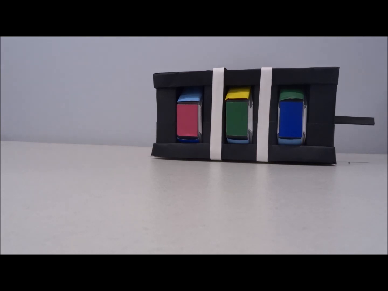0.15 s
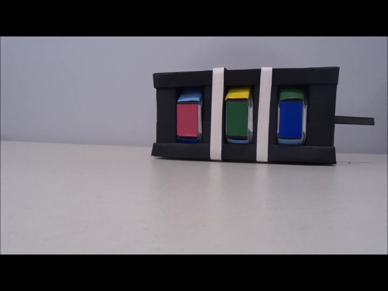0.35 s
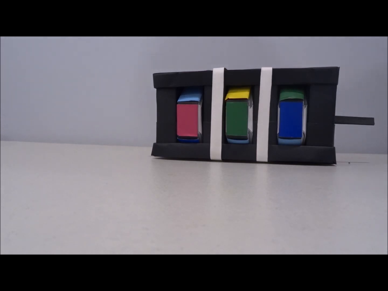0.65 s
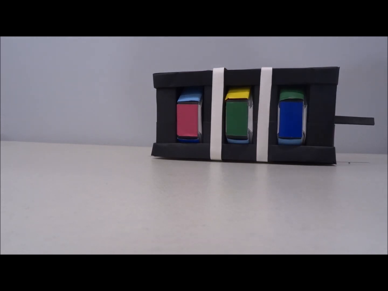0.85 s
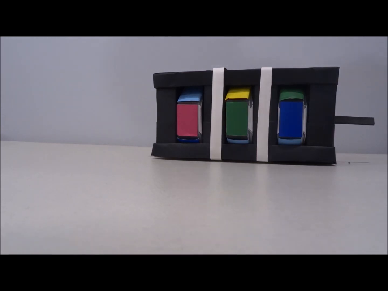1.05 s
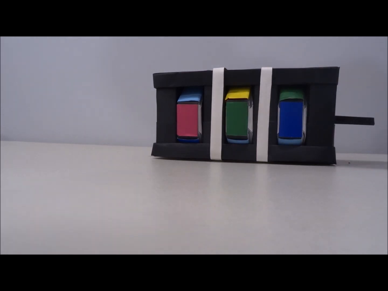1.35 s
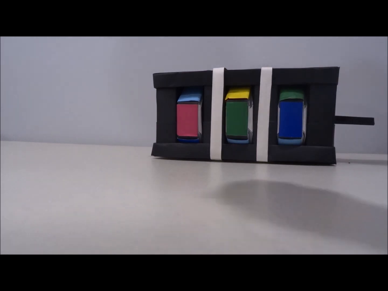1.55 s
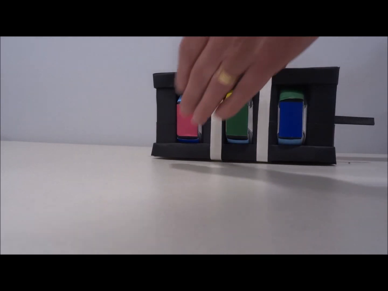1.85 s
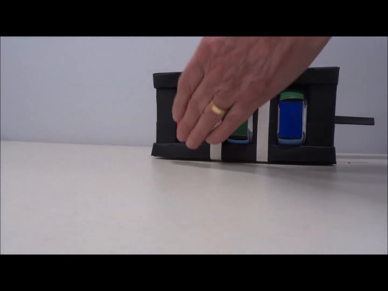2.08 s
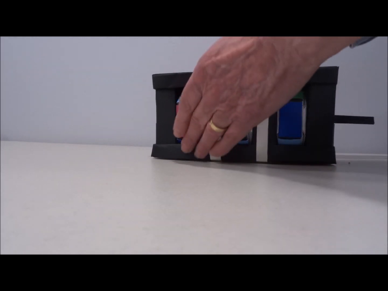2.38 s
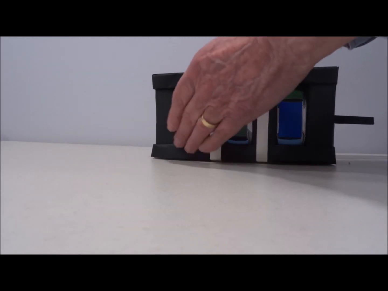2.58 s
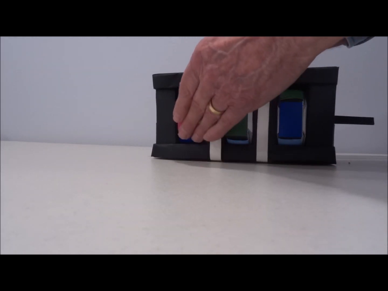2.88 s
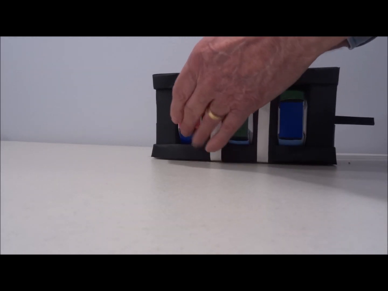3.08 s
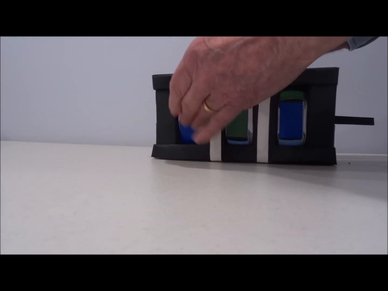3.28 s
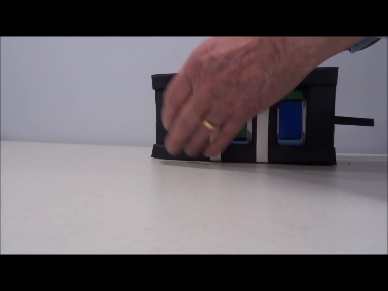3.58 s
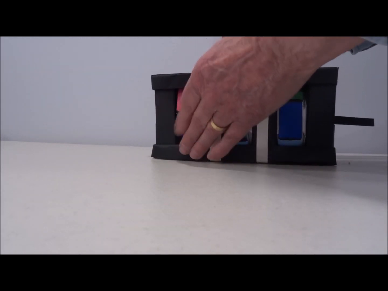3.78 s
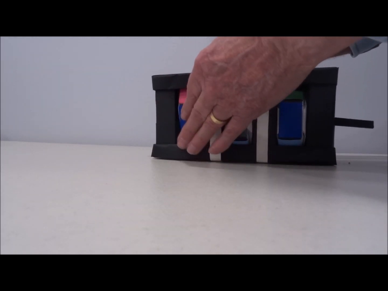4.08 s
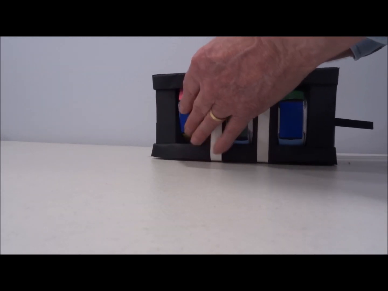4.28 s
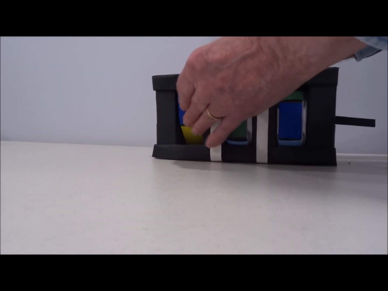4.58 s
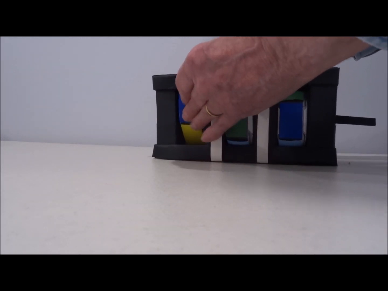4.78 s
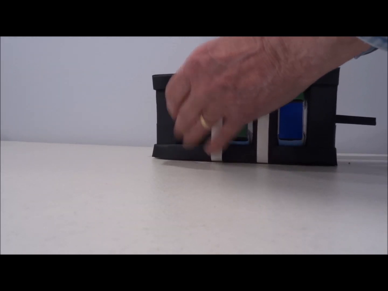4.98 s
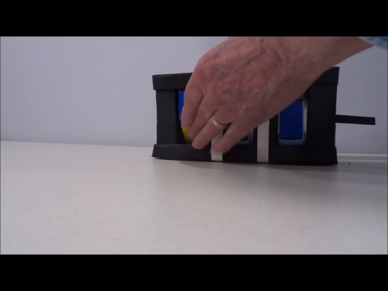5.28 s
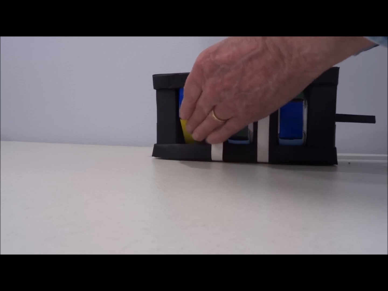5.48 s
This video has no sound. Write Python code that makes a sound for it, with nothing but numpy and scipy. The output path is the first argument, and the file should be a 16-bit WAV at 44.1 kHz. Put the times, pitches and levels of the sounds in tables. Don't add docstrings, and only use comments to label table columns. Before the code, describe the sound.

Close, dry stereo sound of stiff card being worked by hand on a table. It begins nearly still, with low hum and muffled thuds, then fabric rustle and soft contact. Short papery scrapes and crisp ticks grow busier, broken by hollow cardboard knocks and one hard double snap. Rims then slide with faint squeaks, clicking again at the end, in a small room.

```python
import sys
import numpy as np
from scipy import signal
from scipy.fft import rfft, irfft, next_fast_len
from scipy.io import wavfile

SR = 44100
rng = np.random.default_rng(int(sys.argv[2]) if len(sys.argv) > 2 else 0)


def unload_wav(signal):
    wavfile.write(
        sys.argv[1],
        SR,
        np.round(np.clip(np.atleast_2d(signal).T, -1, 1) * 32767).astype(np.int16),
    )


def makeup_ratio(level_db):
    decades = np.asarray(level_db, float) / 20
    return 10 ** decades


N = 248724
TIME = np.arange(N) / SR

# (time [s], peak [dB], hold [s], pitch of the body [Hz], panel slap [dB])
THUDS = [(0.0, -41, 0.0029, 585, 2.5), (0.171, -42, 0.014, 850, 1.5), (0.194, -41.5, 0.022, 735, 3),
         (0.2456, -34.5, 0.054, 725, 2.5), (0.4107, -33, 0.067, 640, 1.5), (1.781, -33, 0.0077, 206, -6),
         (1.949, -40, 0.09, 570, 0), (2.031, -35.5, 0.027, 225, -6), (2.212, -42.5, 0.12, 330, -6),
         (2.398, -31.5, 0.039, 427, 2.5), (4.067, -25, 0.032, 223, -2), (5.063, -30.5, 0.026, 165, -9)]
# (frequency [Hz], level per Hz [dB])
THUD_COLOUR = [(59, -29), (192, 0), (584, -2.5), (1200, -8), (1780, -13.5), (2300, -14.5), (4000, -27),
               (7000, -34)]
THUD_FADE_S, THUD_FADE_PER_HOLD = 0.068, 0.52
DULL_OVER_BODY, DULL_POWER, DULL_PER_DB = 6.2, 2.54, 1.33
FRONT_DB, FRONT_CYCLES = -3, 4.5
SLAP_HZ, SLAP_WIDTH_HZ = 1200, 650

# (frequency [Hz], level per Hz [dB])
SLEEVE = [(1000, -19), (1500, -7), (2200, -1.5), (3300, -3.5), (5000, -3.5), (7000, -6), (9500, -4),
          (11300, -5.5)]
HANDLING = [(290, -13.5), (500, 11), (712, -4.5), (1000, 2), (2060, -8), (4580, -13.5), (7800, -46),
            (13200, -120)]
HUM = [(12, -46), (20, -23), (81, -2.5), (230, -1), (420, -12.5), (709, -23), (1170, -58), (1980, -120)]
# (frequency [Hz], likeness [-1 to 1])
LIKENESS = [(60, 0.98), (170, 0.99), (490, 0.91), (1410, 0.64), (4040, 0.66), (11600, 0.7)]
# (time [s], effort [dB])
EFFORT = [(0, 7.5), (.53, 4.5), (1.1, 5), (1.75, 8.5), (1.81, 17), (1.98, 18), (2.37, 6.5), (2.62, 7.5),
          (3.19, 15), (3.39, 20), (3.62, 9), (3.9, 9.5), (4.15, 12.5), (4.4, 25), (4.48, 15.5), (5.11, 10),
          (5.5, 13), (5.64, 21)]
HAND_DB, SLEEVE_DB, HUM_DB = -67.5, -73, -60.5
SLEEVE_FOLLOWS, HUM_FOLLOWS = 0.64, 0.33
# (time of peak [s], level [dB], build [s], fade [s])
SHIFTS = [
    (0.0, -50, .1, 0.25),
    (.79, -49.5, 0.5, 0.61),
    (1.84, -48, 0.32, 0.17),
    (2.37, -52, 0.077, 0.98),
    (3.39, -40, 0.13, 0.3),
    (4.1, -45, 0.3, 0.32),
    (5.15, -55.5, 1, 1),
]
# (time of peak [s], level [dB], build [s], fade [s])
REACHES = [
    (1.25, -60.5, 0.56, 0.35),
    (1.93, -55, 0.93, 0.33),
    (2.6, -58.5, 0.43, 0.83),
    (4.24, -55.5, 0.11, 1),
    (5.45, -42.5, 0.13, 0.39),
]

# (time [s], peak [dB], pitch [Hz], cycles to die [count])
TAPS = [(0.1735, -35.5, 990, 11), (0.195, -29, 890, 7.4), (0.2472, -28, 950, 8), (0.4115, -32, 810, 8),
        (2.036, -40, 310, 14), (2.049, -37, 320, 11), (2.078, -34, 597, 14), (2.4, -31, 750, 5.6),
        (2.4003, -33, 1650, 14), (2.406, -27, 335, 12), (2.416, -25, 520, 13), (2.436, -28, 1100, 11),
        (2.44, -41, 567, 8.2), (2.471, -32, 520, 12), (2.7878, -45, 1540, 6), (2.788, -37, 4000, 6),
        (2.811, -38, 1730, 8), (2.924, -43, 3300, 10), (2.933, -41, 3200, 10), (3.0076, -37, 1090, 9),
        (3.0648, -31, 1030, 8), (3.188, -37, 1170, 10), (3.229, -26, 2490, 14), (3.4318, -34, 3580, 8),
        (3.448, -39, 3000, 10), (3.495, -36, 560, 13), (3.512, -38, 2000, 10), (4.0763, -9.5, 990, 7.3),
        (4.0776, -23, 2900, 8), (4.087, -21, 450, 5), (4.2266, -37, 4200, 10), (4.2542, -41, 4100, 10),
        (4.323, -25, 900, 10), (4.338, -16, 8200, 14), (4.3399, -15, 4300, 9), (4.3402, -10, 3240, 10),
        (4.352, -32, 610, 6.5), (4.359, -30, 630, 10), (4.387, -23, 2600, 12), (4.4, -22, 3000, 11),
        (4.421, -32, 2300, 14), (4.501, -37, 2810, 16), (4.7023, -38, 1140, 10), (5.052, -33, 800, 7.2),
        (5.057, -28, 420, 4.5), (5.111, -29.5, 600, 6), (5.117, -34, 900, 6), (5.352, -31, 950, 7.1),
        (5.4823, -20.5, 6200, 11), (5.6154, -25.5, 1390, 10)]
# (time [s], peak [dB], pitch [Hz])
BUMPS = [(1.783, -46, 45), (1.788, -40.5, 146), (2.05, -56, 50), (3.078, -45.5, 92), (3.33, -48, 70),
         (3.839, -48, 54), (3.973, -42.5, 163), (4.081, -33, 240), (3.319, -33.5, 301), (4.099, -40, 58.4),
         (4.349, -34.5, 79.6), (4.551, -47, 40.8), (2.45, -59, 40), (3.621, -64, 44.4), (4.752, -47.5, 79),
         (5.039, -30, 185), (5.056, -29, 169), (5.059, -44, 51), (5.501, -48, 83)]

# (start [s], level [dB], body relative to it [dB], hold [s])
STROKES = [(1.791, -40.5, 2, 0.018), (1.854, -39.5, 3, 0.013), (1.862, -43.5, -19, 0.043),
           (2.496, -64, -7, 0.034), (2.613, -41.5, -9, 0.012), (3.0584, -36, 1.5, 0.038),
           (3.268, -34, -19, 0.031), (3.47, -41.5, -5, 0.055), (3.506, -54, -4, 0.011),
           (3.739, -46, 6.5, 0.017), (4.143, -38.5, 11, 0.015), (4.218, -43.5, -6, 0.065),
           (4.328, -23, -2, 0.041), (4.923, -37.5, -5, 0.023), (4.949, -43.5, 7.5, 0.018),
           (5.121, -52.5, 14, 0.016), (5.244, -55, 13, 0.079), (5.346, -38.5, 4.5, 0.052)]
# (release [s], level [dB], body relative to it [dB], build [s], fade [s])
DRAGS = [
    (2.0, -43.5, 7, 0.32, 0.48),
    (2.832, -40, 2.5, 0.053, 0.12),
    (3.018, -36.5, 2, 0.097, 0.11),
    (3.221, -31.5, -5, 0.042, 0.024),
    (3.301, -26, -1, 0.032, 0.046),
    (4.063, -33, 5.5, 0.05, 0.08),
    (4.321, -28, -0.5, 0.031, 0.025),
]
# (start [s], level [dB], hold [s])
SHUFFLES = [
    (2.312, -55, 0.072),
    (2.677, -45.5, 0.013),
    (2.927, -69, 0.049),
    (3.152, -43.5, 0.057),
    (3.904, -51.5, 0.021),
    (3.953, -45.5, 0.028),
]
# (start [s], level [dB], body relative to it [dB], hold [s])
SLIDES = [
    (4.492, -35.5, -5, 0.042),
    (4.594, -37, 0.5, 0.036),
    (4.691, -37, -0.5, 0.033),
    (4.723, -38, 2, 0.039),
    (4.821, -40.5, -3, 0.06),
    (5.413, -36, -1, 0.073),
    (5.485, -38, -1.5, 0.086),
    (5.584, -40.5, 2, 0.058),
]
# (frequency [Hz], width [Hz], level [dB])
CARD = [(548, 240, 6), (1120, 134, 4.5), (1660, 590, -5), (2330, 390, 2.5), (2900, 1400, -1),
        (4300, 3100, -4.5), (5840, 3600, -13.5), (7970, 1550, 1.5), (11140, 2140, 13)]
# (frequency [Hz], width [Hz], level [dB])
SLOT = [(2230, 270, 3), (2920, 400, 1), (4740, 380, -13)]
STROKE_HISS_DB, DRAG_HISS_DB, SLIDE_HISS_DB = -6, -14.5, -9.5
SHUFFLE_BODY_DB, SHUFFLE_HISS_DB = 7.5, -31
SLOT_DB, SLIDE_HOLLOW_DB = -2.5, -3
HISS_PER_DB, FIRM_DB = 0.48, -28
FADE_S, FADE_PER_HOLD = 0.025, 0.79

# (start [s], level [dB], hold [s], pitch [Hz])
SINGING = [(1.854, -50.5, 0.048, 2070), (1.922, -48.5, 0.056, 1590), (1.931, -52.5, 0.04, 307),
           (1.981, -40, 0.06, 315.4), (2.031, -34.5, 0.012, 316.4), (1.951, -48, 0.12, 604),
           (1.98, -48.5, 0.057, 1120), (2.208, -54.5, 0.093, 319), (2.212, -58, 0.075, 545),
           (2.404, -38, 0.014, 337.5), (2.41, -40.5, 0.038, 576), (3.318, -32.5, 0.026, 550),
           (3.352, -44.5, 0.021, 733), (3.384, -46, 0.011, 545), (3.41, -52.5, 0.04, 545),
           (4.335, -39.5, 0.03, 3930), (4.344, -34, 0.014, 608), (4.405, -48, 0.012, 547),
           (4.448, -52.5, 0.081, 560), (5.045, -52.5, .02, 800), (4.598, -51, 0.024, 1110),
           (4.335, -53, 0.025, 10200), (5.585, -53, 0.028, 2400), (2.637, -53.5, 0.026, 610),
           (4.11, -51, 0.017, 2460), (4.832, -60, 0.048, 1085), (4.838, -48, 0.017, 564),
           (5.592, -45, .05, 612)]
SING_WIDTH, SING_RISE_S, SING_FADE_S = 0.13, 0.018, 0.074
# (start [s], level [dB], hold [s], pitch [Hz])
SQUEAKS = [(3.904, -62, 0.01, 3240), (4.503, -49.5, 0.034, 2900), (4.51, -66, 0.024, 4700),
           (4.505, -51.5, .04, 1120), (4.52, -46, .03, 597), (4.62, -52, .025, 2950),
           (4.6, -67, 0.03, 5000), (4.733, -46.5, 0.011, 2870), (4.735, -51, .03, 1100),
           (4.77, -49, 0.0096, 495), (4.835, -52.5, 0.057, 1116), (4.85, -58, .04, 2640),
           (5.368, -54, 0.014, 2900), (5.375, -47, 0.011, 745), (5.39, -57, .02, 2200),
           (5.435, -48, .035, 2930), (5.462, -49, .008, 4600), (5.464, -43.5, .008, 1190),
           (5.5, -58, 0.045, 2900), (5.56, -51.5, 0.061, 1013)]
SQUEAK_WIDTH, SQUEAK_RISE_S, SQUEAK_FADE_S = 0.051, 0.005, 0.021
EVENNESS = 0.47

# (time [s], peak [dB], pitch [Hz], length [s])
CRACKLES = [(2.304, -46, 3500, 0.1), (2.311, -45, 5000, 0.047), (2.491, -44.5, 5050, 0.16),
            (2.679, -46, 2440, 0.052), (2.685, -48, 2410, 0.046), (2.799, -42.5, 3060, 0.73),
            (4.142, -38, 2550, 0.058), (4.7396, -39, 2580, 0.058), (5.131, -44.5, 5030, 0.28),
            (5.261, -42, 5400, 0.059), (5.109, -39, 4730, 0.11), (2.923, -50, 2620, 0.035),
            (2.336, -46, 3000, 0.016), (2.368, -48, 3200, .03), (2.439, -50, 5500, 0.14),
            (3.541, -42, 3160, 0.016), (3.8023, -45, 3280, 0.13), (4.194, -45, 7000, 0.017),
            (5.209, -50, 4850, 0.037), (5.306, -41.5, 5000, 0.025)]
# (time [s], peak [dB], pitch [Hz], box thump
# relative to it [dB])
THUMP_TICKS = [(2.37, -50, 1100, 8), (5.0402, -24.5, 670, -32), (5.0449, -26.5, 800, -32),
               (5.0368, -27.5, 770, -30), (3.4316, -38, 1300, -8), (4.254, -29, 850, -6),
               (4.5392, -34, 2250, -4), (4.5986, -33, 2200, -16), (4.8, -33, 3000, -19),
               (4.8008, -35, 1650, -19), (4.8026, -39, 1650, -19), (4.9599, -27, 3160, -12),
               (4.9606, -36, 1650, -10), (3.494, -27, 1740, -13.5), (5.6157, -31, 1200, -20.5)]
# (time [s], peak [dB], pitch [Hz], broad snap relative to it [dB])
TICKS = [(3.3167, -22, 3300, -20), (3.0674, -32, 3380, -13.5), (3.2793, -27, 2890, -18),
         (3.2959, -25, 2440, -18), (4.2245, -41, 5000, -10), (4.2262, -32, 3000, -12),
         (3.425, -35, 2900, -17), (3.4937, -23, 4350, -16), (3.639, -50, 8000, -14),
         (3.6503, -29, 3900, -12), (3.8059, -30, 3200, -15), (3.8977, -36, 3000, -18),
         (3.9055, -43, 3000, -14), (3.9105, -42, 3200, -14), (4.0774, -19, 2170, -17),
         (4.0797, -20, 1900, -20), (4.0864, -44, 2510, -9), (4.1632, -38, 2600, -18),
         (4.2858, -32, 2800, -20), (4.3225, -27, 2770, -20), (5.042, -31, 3350, -11),
         (5.0365, -36, 3000, -11), (4.3379, -9, 4200, -12), (4.3389, -11, 2350, -16), (4.7, -41, 2910, -18),
         (4.7108, -34, 3300, -16), (5.1, -44.5, 4600, -2), (5.2989, -44, 3600, -4),
         (5.2637, -37, 5400, -10), (5.3527, -33, 4800, -14), (5.4823, -18, 2950, -14)]
SLIP_S, TICK_THUMP_DB, FLAP_SNAP_DB = 0.024, -19.5, -17
CREASE_SNAP_DB, CREASE_THUMP_DB = -4.5, -27
TICK_CYCLES, TICK_TRAIL_DB, TICK_EDGE_DB = 10.5, -23, -10

# (time [s], level at 560 Hz [dB], then relative to it: hollow boom [dB], wall slap [dB], edge crack [dB])
KNOCKS = [
    (3.3155, -22, -10, -29, 4),
    (3.3172, -14.5, -9.5, 1, -4),
    (4.0694, -31.5, -4.5, 9, 9),
    (4.0791, -29.5, 2, 15.5, -29),
    (4.0776, -27.5, 3.5, -5, 11),
    (4.3391, -12.5, -16.5, -7, -14),
    (5.0359, -46, 7, 7, -2),
    (5.0406, -41.5, 3, 9.5, -2),
    (5.045, -41.5, 10, 11, -4),
    (5.614, -39, -14, -7, 6),
]
# (frequency [Hz], level [dB], time to fall 60 dB [s])
BOX = [(165, -6, 0.19), (242, 0.5, 0.14), (302, -8, 0.13), (412.4, 1, 0.3), (447, 0.5, 0.12),
       (545, -5.5, 0.23), (570, -1, 0.11), (728, 3.5, 0.018), (752, -6, 0.16), (855, -13.5, 0.11),
       (1112, 1.5, 0.025), (1300, -20, 0.18), (1740, -5.5, 0.075), (2330, -4, 0.014)]
ROOM_T60_S, ROOM_DB, WALL_CUT_HZ = 0.11, -15.5, 21000


def rms_one(x):
    return x / np.sqrt(np.mean(x ** 2) + 1e-20)


def at_hz(points, hz):
    table = np.array(points)
    return np.interp(np.log(hz), np.log(table[:, 0]), table[:, 1])


def passed(x, hz, kind):
    return signal.sosfilt(signal.butter(2, np.clip(hz, 10, .45 * SR), kind, fs=SR, output="sos"), x)


def resonance(x, hz, width):
    r = np.exp(-np.pi * width / SR)
    return (1 - r * r) / 2 * signal.lfilter([1, 0, -1], [1, -2 * r * np.cos(2 * np.pi * hz / SR), r * r], x)


def ring(clicks, hz, t60):
    r, w = makeup_ratio(-60 / (t60 * SR)), 2 * np.pi * hz / SR
    return signal.lfilter([0, np.sin(w)], [1, -2 * r * np.cos(w), r * r], clicks + 1e-18)


def lingering(clicks, t60):
    return signal.lfilter([1], [1, -makeup_ratio(-60 / (t60 * SR))], clicks + 1e-18)


def swell(t, hold, fade, rise):
    return np.clip(t / rise, 0, 1) * np.exp(-np.log(10) * np.clip((t - hold) / max(fade, .001), 0, 8))


def build_up(t, db, build, hold, fade):
    return makeup_ratio(db + 20 * np.clip(t / build, -8, 0)) * swell(t + 9, 9 + hold, fade, rise=1)


def drift(rate):
    r = np.exp(-80 * np.pi * rate / SR)
    slow = signal.lfilter([1], [1, -2 * r, r * r], rng.standard_normal(N // 40 + 2002))[2000:]
    return np.interp(np.arange(N) / 40, np.arange(len(slow)), rms_one(slow))


def coloured(spectrum, patchy_db):
    out, edges = 0, 16 * 2 ** np.arange(0, 10, .5)
    white = rng.standard_normal((2, 2, N))
    for k, (low, high) in enumerate(zip(edges, edges[1:])):
        centre = np.sqrt(low * high)
        level_db = at_hz(spectrum, centre)
        if level_db < -42:
            continue
        mid, side = passed(white[k % 2], [low, high], "band")
        alike = np.clip(at_hz(LIKENESS, centre), -1, 1)
        gain = makeup_ratio(level_db + patchy_db * drift(9.1))
        out = out + gain * (np.sqrt(1 + alike) * mid + np.sqrt(1 - alike) * side * [[1], [-1]])
    return rms_one(out)


def thuds():
    noise, out = coloured(THUD_COLOUR, patchy_db=-1.0), np.zeros((2, N))
    for s, peak_db, hold, body_hz, slap_db in THUDS:
        fade = THUD_FADE_S + THUD_FADE_PER_HOLD * hold
        dull_hz = DULL_OVER_BODY * 500 * (body_hz / 500) ** DULL_POWER
        dull_hz = dull_hz * makeup_ratio(DULL_PER_DB * (peak_db + 34.5))
        span = slice(round(s * SR), round((s + .6) * SR))
        t = TIME[span] - s
        front = makeup_ratio(8.0 + FRONT_DB) * ring(1.0 * (t == t[0]), 1.12 * body_hz, FRONT_CYCLES / body_hz)
        burst = noise[:, span] * swell(t, hold, fade, rise=0.0014) + front
        body = 2.0 * resonance(burst, body_hz, 0.52 * body_hz)
        burst = burst + body
        whole = burst - body
        burst = burst - makeup_ratio(slap_db) * resonance(whole, SLAP_HZ, SLAP_WIDTH_HZ) * 2.62
        out[:, span] += makeup_ratio(peak_db - 12.0) * passed(passed(burst, dull_hz, "low"), dull_hz, "low")
    return out


def surge(rows):
    t = TIME[::64]
    power = sum(build_up(t - s, db, build, -0.151, fade) ** 2 for s, db, build, fade in rows)
    return np.interp(TIME, t, power)


def hum(effort_db):
    level = np.sqrt(makeup_ratio(HUM_DB + HUM_FOLLOWS * effort_db) ** 2 + surge(SHIFTS))
    return level * coloured(HUM, patchy_db=1.0)


def sleeve_rustle(effort_db):
    level = np.sqrt(makeup_ratio(SLEEVE_DB + SLEEVE_FOLLOWS * effort_db) ** 2 + surge(REACHES))
    return level * coloured(SLEEVE, patchy_db=-0.85)


def handling(effort_db):
    return makeup_ratio(HAND_DB + effort_db) * coloured(HANDLING, patchy_db=2.5)


def taps():
    out, t = np.zeros(N + 4096), TIME[:4096]
    for s, peak_db, hz, cycles in TAPS:
        i = round(s * SR)
        fading = makeup_ratio(peak_db - 60 * t * hz / max(cycles, 1))
        out[i:i + len(t)] += fading * np.sin(2 * np.pi * hz * t) * np.clip(2 * t * hz, 0, 1)
    return out[:N]


def bumps():
    out, t = np.zeros(N + SR // 2), TIME[:SR // 2]
    for s, peak_db, hz in BUMPS:
        i = round(s * SR)
        fading = makeup_ratio(peak_db - 60 * t / (0.044 + 14.6 / hz))
        out[i:i + len(t)] += fading * np.sin(2 * np.pi * hz * t) * np.clip(t / 0.0023, 0, 1)
    return out[:N]


def rubbed_card():
    sizes = makeup_ratio(3.5 * np.minimum(rng.exponential(1, N), 5)) * rng.choice([-1, 1], N)
    catches = rng.random(N) < 4000 * makeup_ratio(3.0 * drift(40)) / SR
    grains = rms_one(sizes * catches) + 0.52 * rng.standard_normal(N)
    shaped = makeup_ratio(-7) * grains[::-1]
    for k, (hz, width, level_db) in enumerate(CARD):
        shaped = shaped + makeup_ratio(level_db) * resonance(grains, hz, width) * (-1) ** k
    bands = [[380, 1400], [1400, 3600], [3600, 6600], [6600, 11500]]
    layers = [rms_one(passed(shaped, edges, "band")) for edges in bands]
    slot = 0
    for hz, width, level_db in SLOT:
        slot = slot + makeup_ratio(level_db) * resonance(resonance(grains[::-1], hz, width), hz, 2 * width)
    return layers + [rms_one(slot)]


def rubbing():
    t = TIME[::16]
    shapes = [swell(t - s, hold, FADE_S + FADE_PER_HOLD * hold, rise=0.01)
              for s, *_, hold in SLIDES + STROKES + SHUFFLES]
    shapes += [build_up(t - s, 0, build, 0.013, fade) for s, *_, build, fade in DRAGS]
    rows = [(db, body, SLIDE_HISS_DB) for _, db, body, _ in SLIDES]
    rows += [(db, body, STROKE_HISS_DB) for _, db, body, _ in STROKES]
    rows += [(db, SHUFFLE_BODY_DB, SHUFFLE_HISS_DB) for _, db, _ in SHUFFLES]
    rows += [(db, body, DRAG_HISS_DB) for _, db, body, *_ in DRAGS]
    db, body, hiss = np.transpose(rows)
    hiss = hiss + HISS_PER_DB * (db - FIRM_DB)
    levels = makeup_ratio(db - 13 + np.array([body, 0 * db, 0.11 * hiss - 3, hiss, 0 * db + SLOT_DB]))
    levels[4, len(SLIDES):] = 0
    levels[1:3, :len(SLIDES)] *= makeup_ratio(SLIDE_HOLLOW_DB)
    pressure = np.sqrt(levels ** 2 @ np.square(shapes))
    out = np.zeros(N)
    for k, (gain, layer) in enumerate(zip(pressure, rubbed_card())):
        out += np.interp(TIME, t, gain) * layer * (-1) ** k
    return out


def singing(rows, share, rise, fade):
    out = np.zeros(N)
    for s, level_db, hold, hz in rows:
        span = slice(round(s * SR), round((s + .4) * SR))
        t, noise = TIME[span] - s, rng.standard_normal(SR // 2)
        width = share * hz * (hz / 500) ** 0.46
        tone = rms_one(resonance(resonance(noise, hz, width), hz, width))
        tone = rms_one(tone / (np.abs(signal.hilbert(tone)) + 0.36) ** EVENNESS)
        out[span] += makeup_ratio(level_db) * tone[-len(t):] * swell(t, hold, fade, rise)
    return out


def ticks():
    size = 2560
    out, t = np.zeros(N + size), TIME[:size]
    slips = [(*row, TICK_THUMP_DB, SLIP_S, 1) for row in TICKS]
    slips += [(s, db, hz, FLAP_SNAP_DB, thump, SLIP_S, 1) for s, db, hz, thump in THUMP_TICKS]
    slips += [(s, db, hz, CREASE_SNAP_DB, CREASE_THUMP_DB, length, 0) for s, db, hz, length in CRACKLES]
    flick = 1.0 * (t == 0)
    thump = np.sin(2 * np.pi * 600 * t) * makeup_ratio(-60 * t / 0.061) * np.clip(t / 0.0031, 0, 1)
    for s, peak_db, hz, snap_db, thump_db, length, sharp in slips:
        noise = rng.standard_normal((2, size))
        trail_rise = 0.0001 if sharp else 0.033 * length
        trail = noise[0] * swell(t, 0.024 * length, 0.16 * length, trail_rise)
        if sharp:
            tone = ring(flick + makeup_ratio(TICK_TRAIL_DB) * trail, hz, TICK_CYCLES / hz)
        else:
            tone = ring(trail, hz, 6.1 / hz)
        snap_rise = 0.00048 if sharp else 0.015 * length
        snap = passed(noise[1], [1300, 9000], "band") * swell(t, 0.057 * length, 0.26 * length, snap_rise)
        snap = makeup_ratio(snap_db - 2.0) * snap + sharp * makeup_ratio(TICK_EDGE_DB) * passed(flick, hz, "high")
        i = round(s * SR)
        out[i:i + size] += makeup_ratio(peak_db) * (tone / np.abs(tone).max() + snap + makeup_ratio(thump_db - 1.5) * thump)
    return out[:N]


def knocks():
    rows, out = np.array(KNOCKS), np.zeros(N)
    at = np.round(rows[:, 0] * SR).astype(int)
    luck_db = rng.normal(0, 1.5, (len(rows), len(BOX)))
    rattle = rng.standard_normal((3, N))
    for k, (hz, level_db, t60) in enumerate(BOX):
        colour_db = [at_hz([(230, boom - 3), (465, boom + 3), (540, 0), (605, 0), (690, 0.9 * slap),
                            (1100, slap), (2400, crack)], hz) for boom, slap, crack in rows[:, 2:]]
        clicks = np.zeros(N)
        clicks[at] = makeup_ratio(rows[:, 1] + colour_db + level_db + luck_db[:, k]) * (-1) ** ((k + 1) // 3)
        shaking = lingering(clicks, .18) * rattle[k % 2]
        blow = makeup_ratio(-19.5 - 2.8 * hz / 1000) * clicks + makeup_ratio(-40.0) * shaking
        slap_ring = makeup_ratio(-4.0) * ring(clicks, hz, 11.0 / hz + 0.0095)
        out += ring(blow, hz, 0.76 * t60) + slap_ring
    clicks = np.zeros(N)
    clicks[at] = makeup_ratio(rows[:, 1] + rows[:, 3])
    flutter = passed(lingering(clicks, .13) * rattle[2], [650, 2400], "band")
    return passed(out + makeup_ratio(-7.0) * flutter, [130, 4500], "band")


def room(x):
    size = next_fast_len(N + SR)
    hz = np.arange(size // 2 + 1) * SR / size
    echoes = np.zeros((2, len(hz)), complex)
    for k, lag in enumerate(rng.uniform(0.02, 0.03, 12)):
        loop = makeup_ratio(-60 * lag / ROOM_T60_S) / (1 + 1j * hz / WALL_CUT_HZ) * np.exp(-2j * np.pi * hz * lag)
        echoes[k % 2] += loop / (1 - loop) * (-1) ** (k // 2)
    return irfft(rfft(x, size) * echoes, size)[:, :N]


def scene():
    effort_db = np.interp(TIME, *np.transpose(EFFORT))
    lock = taps() + rubbing() + ticks() + knocks()
    lock = lock + singing(SINGING, SING_WIDTH, SING_RISE_S, SING_FADE_S)
    lock = lock + singing(SQUEAKS, SQUEAK_WIDTH, SQUEAK_RISE_S, SQUEAK_FADE_S)
    top = passed(0.081 * lock + np.roll(lock, 17), 3100, "high")
    near = lock * makeup_ratio(np.array([[-.2], [.2]])) + 0.26 * top * [[-1], [1]]
    near = near + makeup_ratio(ROOM_DB) * passed(room(lock), 240, "high")
    around = hum(effort_db) + sleeve_rustle(effort_db) + handling(effort_db)
    return near + around + thuds() + bumps() * makeup_ratio(np.array([[.4], [-.4]]))


def roll_off(x):
    return signal.sosfilt(signal.butter(12, 12190, fs=SR, output="sos"), x)


def record(dry):
    steep = signal.cheby2(14, 50, 11600, fs=SR, output="sos")
    return roll_off(signal.sosfilt(steep, dry))


dry = scene()
out = record(dry)
unload_wav(out)
```